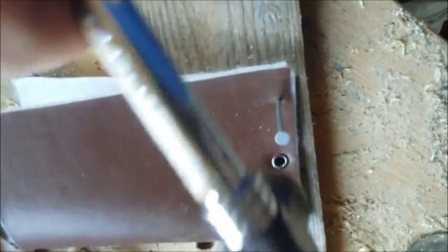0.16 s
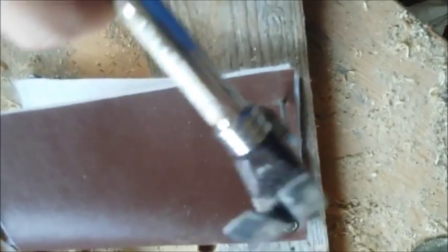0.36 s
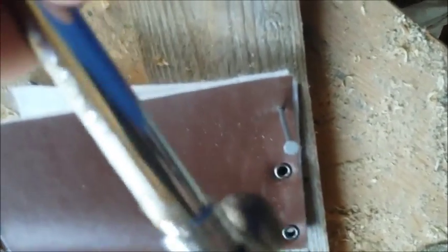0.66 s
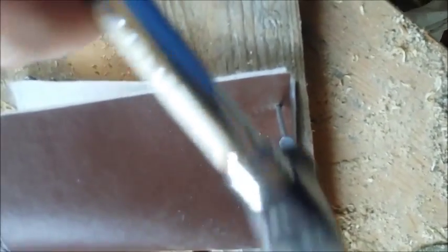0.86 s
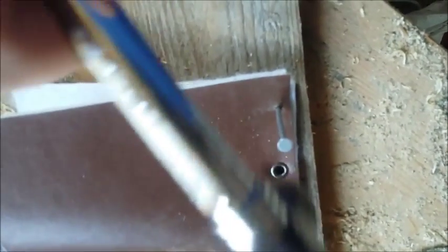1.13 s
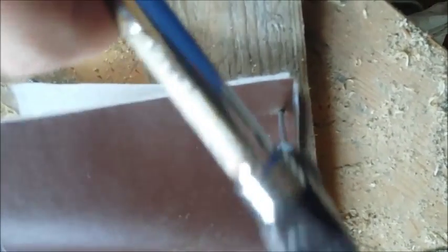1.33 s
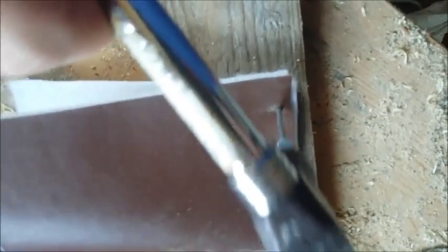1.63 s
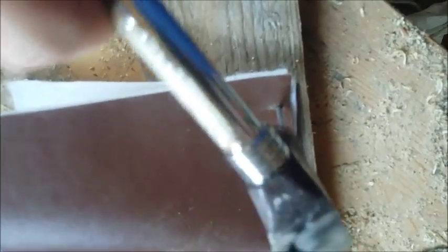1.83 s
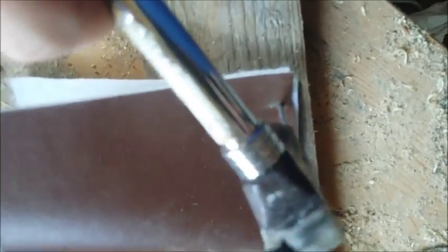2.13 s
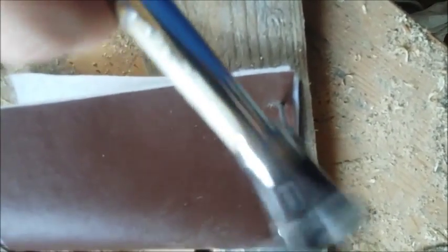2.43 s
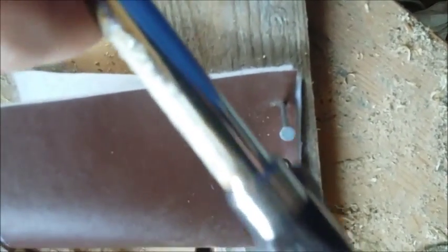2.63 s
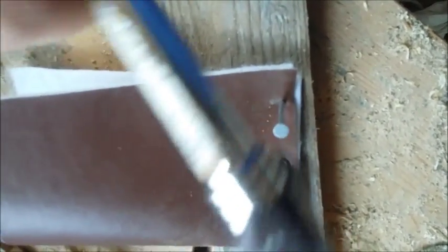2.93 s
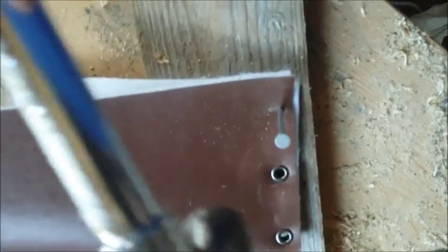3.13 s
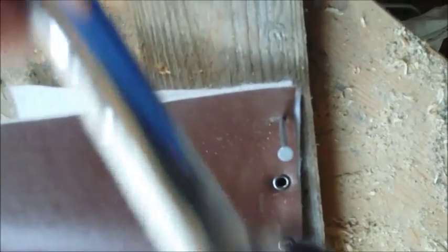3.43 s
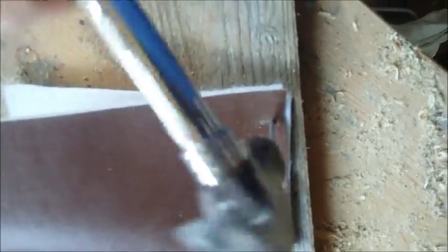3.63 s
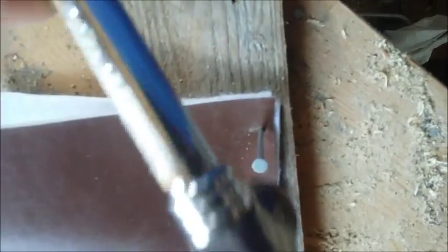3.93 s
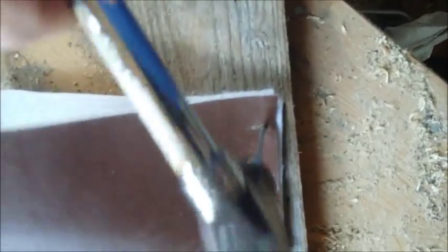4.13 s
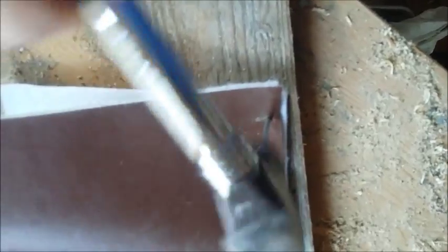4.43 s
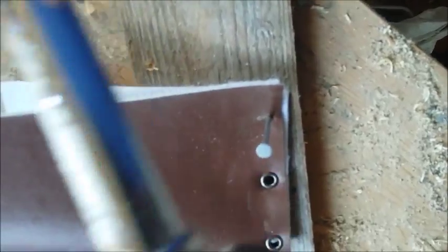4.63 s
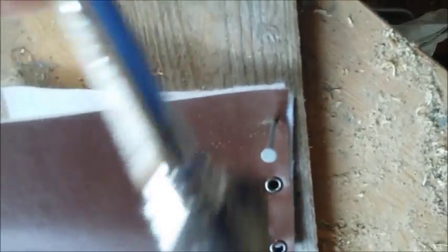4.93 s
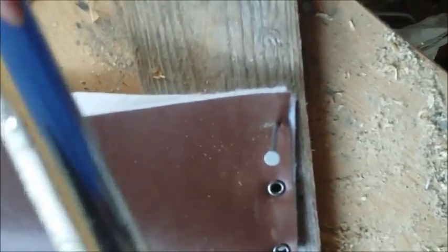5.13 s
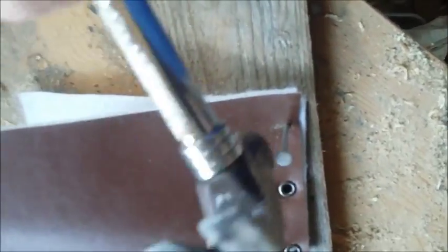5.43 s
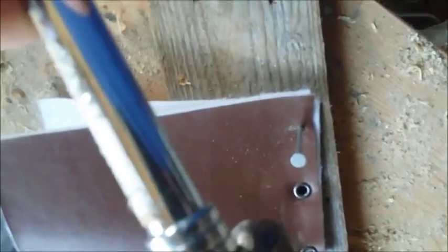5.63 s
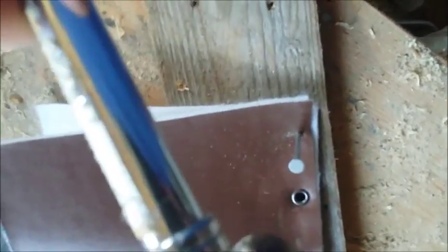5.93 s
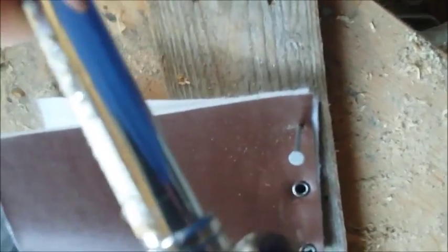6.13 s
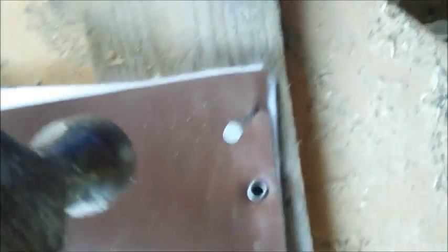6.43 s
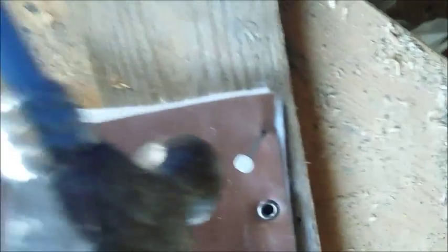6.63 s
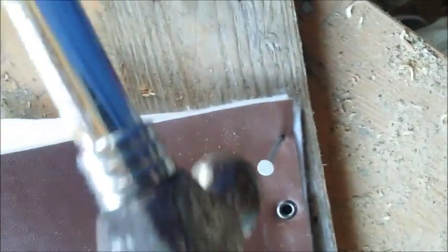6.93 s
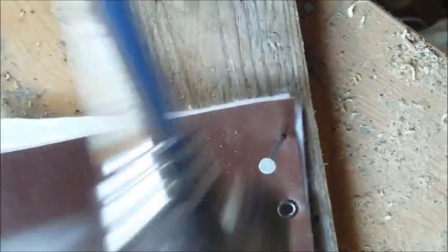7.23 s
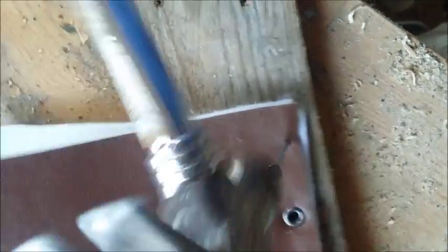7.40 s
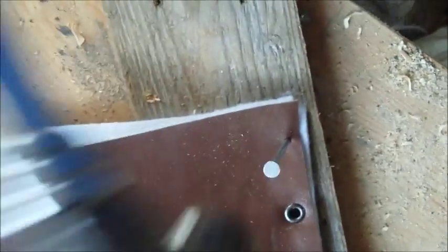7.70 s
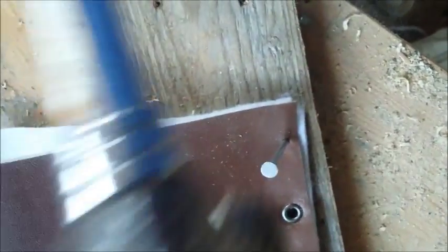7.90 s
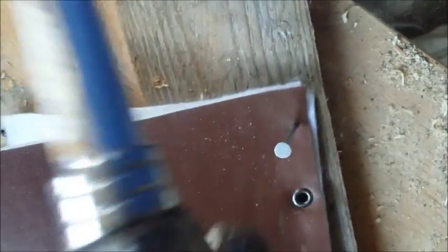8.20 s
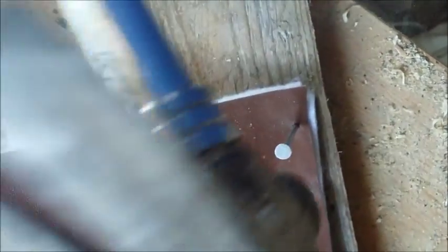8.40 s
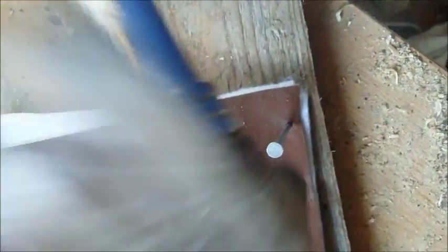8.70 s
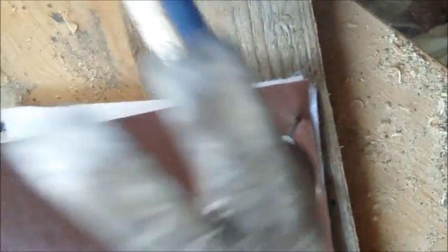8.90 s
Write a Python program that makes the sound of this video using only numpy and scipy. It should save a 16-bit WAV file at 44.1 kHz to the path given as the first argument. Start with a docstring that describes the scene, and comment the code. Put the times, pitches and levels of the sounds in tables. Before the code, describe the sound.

A steel hammer taps a nail through leather into a plank, the blows growing harder and further apart, with faint birds outside.

```python
"""A steel hammer taps, then drives a nail through leather into a plank, close to a stereo microphone
at a workbench in a small shed. Each blow cracks on the nail, sinks it a little, then thumps plank and
bench; the deeper it sits, the less it slides and the harder the blows clack. Faint birds sing outside
over a low rumble and hiss. The background drops out for a moment before the last three blows, and the
hardest of them overdrives the right microphone."""
import sys
import numpy as np
from scipy import signal
from scipy.fft import rfft, irfft, next_fast_len
from scipy.io import wavfile
from scipy.ndimage import uniform_filter1d

SR = 44100
rng = np.random.default_rng(int(sys.argv[2]) if len(sys.argv) > 2 else 0)


def put_to_file(sound):
    """Save the sound as 16-bit audio at rate SR, in the file named by the first command-line argument."""
    columns = np.atleast_2d(sound).T  # one column per channel
    safe = np.clip(columns, -1, 1)
    whole_steps = np.round(safe * 32767)
    wavfile.write(sys.argv[1], SR, whole_steps.astype(np.int16))


N = 399546
TIME = np.arange(N) / SR
TAIL = np.arange(SR * 2 // 5) / SR  # time axis of one strike, s

# Levels in the tables are relative; the gains further down set the balance.
# Blows and hard rebounds: start_s, force_db, slide_s, plank_over_force_db, bench_over_force_db
BLOWS = [(0.1646, -45, 0.0074, 6, 4.5), (1.0379, -43.5, 0.0081, 10.5, 12),
         (1.337, -37.5, 0.00602, 8.5, 11.5), (1.6312, -38, 0.0064, 11.5, 13),
         (1.9314, -37, 0.006, 12.5, 14.5), (2.2263, -35, 0.0027, 14.5, 14), (2.548, -33, 0.0043, 12, 11.5),
         (2.5873, -44.5, 0.0011, 5, 1), (2.9096, -30.5, .0025, 11.5, 12.5), (4.1783, -32, 0.0026, 15, 14),
         (4.5424, -31, .0009, 11, 12.5), (4.9403, -31, 0.001, 11, 13), (5.4542, -31.5, 0.00081, 2.5, 0),
         (5.4937, -40, 0.0015, -6.5, -9), (7.5212, -23, 0.0014, 6.5, 2), (8.1626, -32, .0011, 3, 4.5),
         (8.8746, -34.5, 0.00097, 5, 4)]
# Light touches of the hammer while aiming: start_s, level_db
TOUCHES = [(0.4392, -47.5), (0.4547, -55.5), (.4925, -57.5), (4.516, -53)]
# Ringing modes of each part, of the hard contact and of nearby steel: pitch_hz, level_db, t60_s
NAIL_MODES = [(4300, -7, .012), (4710, -1, .014), (4870, 0, .01), (5050, -2, .012), (5500, -9, .012),
              (8100, -23, .02)]
HAMMER_MODES = [(2465, -2, .025), (2684, 2, .05), (3114, 7, 0.033), (3280, -2, 0.02), (4300, -8.5, 0.012)]
CLACK_MODES = [(1024, -1.5, 0.079), (1151, 2, 0.088), (1199, 0.5, .1), (1300, 7.5, 0.037),
               (1462, -12.5, 0.085), (1655, -5.5, 0.045), (1740, -15.5, 0.37), (1960, -8.5, 0.027),
               (2220, -8, 0.017)]
CLANK_MODES = [(1194, 1.5, 0.092), (1240, -4, .1), (1328, 3, 0.079), (1650, -10, 0.063), (2780, -4, .07)]
PLANK_MODES = [(210, -14.5, 0.3), (255, -0.5, 0.16), (279.7, -7.5, 0.2), (294.4, -1, 0.23),
               (327.4, -5, 0.27), (427.3, -1, 0.18), (463.4, -4.5, 0.21), (522, 4.5, 0.15),
               (570.5, -3.5, 0.22), (617, 3.5, 0.078), (696, -1, 0.14), (768, -2, 0.17), (850, -8, 0.096),
               (951, -10.5, 0.16)]
BENCH_MODES = [(74, -16, 0.44), (109.4, -5.5, 0.32), (124.3, 5.5, 0.15), (152.7, -3.5, 0.26),
               (161.2, -0.5, 0.17)]
NEARBY_STEEL_MODES = [(1319, -8, .8), (1776, 0, .95)]
# Contact noise spectra: frequency_hz, level_db
NAIL_NOISE = [(400, -32.5), (700, -5.5), (1800, -6), (3000, -9.5), (4100, -3), (4900, -1.5), (5600, -1.5),
              (6500, -13), (9000, -21), (12000, -27.5), (16000, -29.5)]
HAMMER_NOISE = [(1700, -31.5), (2300, 8.5), (3000, 0), (3700, -7), (4600, -30.5)]
CLACK_NOISE = [(700, -26.5), (1050, 4), (2100, 7.5), (2800, -39.5)]
PLANK_NOISE = [(120, -31.5), (220, 12.5), (900, 6.5), (1400, -44.5)]
RUB_NOISE = [(400, -22), (1000, 3.5), (1800, 10), (3500, 2), (5200, -12.5), (6500, -23), (8100, -14),
             (9000, -36), (16000, -24.5)]
# Decay of the shed's echo: frequency_hz, t60_s
SHED_DECAY = [(100, .3), (300, .26), (700, .19), (2000, .17), (5000, .18), (9000, .14), (15000, .1)]
# Strength of that echo: frequency_hz, level_db
SHED_ECHO = [(100, -12.5), (300, -9.5), (700, -11.5), (1500, -11), (3000, -8.5), (5000, -10), (8000, -10.5),
             (11000, -12), (15000, -17)]
# Balance at the microphone ports: frequency_hz, left_over_right_db
PORT_BALANCE = [(60, -1.5), (200, -1.5), (500, 0.46), (1300, -1), (2600, 3.5), (3500, -6), (4700, -12),
                (6000, -10.5), (8100, -4), (15000, -1.5)]
# Phase of the direct sound at the ports: frequency_hz, left_lead_rad
PORT_PHASE = [(100, -0.4), (250, -.5), (500, -0.48), (1200, -1.48), (1900, -2.5), (2200, -2), (2600, -4.5),
              (3100, -4.5), (5000, -6.5), (7000, -13), (11500, -14.5), (16000, -24)]
# Likeness of left and right in diffuse sound: frequency_hz, correlation
STEREO_LIKENESS = [(60, 0.67), (290, 0.99), (640, 0.25), (1400, 0), (15000, 0.12)]
# Overload of the right microphone: start_s, deaf_s, swing_hz, swing_db, t60_s
OVERLOAD = [(7.524, 0.0072, 109.1, -1.5, .075)]
# One distant bird's rising chirps: start_s, starting_pitch_hz, level_db
CHIRPS = [(3.189, 2710, -59), (3.467, 2670, -58), (3.745, 2660, -57.5), (4.026, 2610, -57),
          (4.12, 3310, -57)]
# Thin whistles of other birds: start_s, pitch_hz, level_db
WHISTLES = [(3.32, 3190, -78), (3.57, 2760, -63.5), (3.83, 2760, -62), (4.32, 7600, -71.5),
            (4.74, 5640, -67.5), (5.95, 2864, -53), (6.06, 2924, -65.5)]
# Spectra of the outdoor rumble and hiss: frequency_hz, level_db
RUMBLE_SPECTRUM = [(15, -42.5), (25, -10), (27, -25), (50, -6.5), (95, -0.5), (148, -2), (195, -1.5),
                   (275, -5), (310, -11.5), (1500, -24.5), (1950, -52.5), (3300, -120)]
HISS_SPECTRUM = [(700, -27), (1200, -10.5), (1900, -7), (2700, -1), (3300, -4), (4100, -2.5), (5100, -5.5),
                 (6000, -15.5), (7700, -20.5), (10000, -26), (16000, -27.5)]
# Level of the background rumble and hiss, which wavers, then ducks sharply after the hardest blow:
# time_s, level_db
BACKGROUND_LEVEL = [(0, -0.5), (3, 2), (3.4, 0), (5, 1), (6.2, -4), (6.9, 2), (7.5, -0.5), (8, -12.5),
                    (9.06, -13.5)]

NAIL_DB, HAMMER_DB, CLACK_DB = -0.5, 0, 8  # base levels over the force of the blow
CLACK_LOSS_DB_PER_S = 851  # a sliding nail cushions the clack
CLANK_DB, CLANK_KNEE_DB, CLANK_LOSS = -3, 2.5, 6.2  # over the clack; plank level it fades above; dB/dB
RASP_SLIDE_S = .0028  # slide at which a standing nail rasps as loudly as it rings
HOME_S = 6.5  # from here on the nail head sits on the leather
HOME_SHIFT_DB, HOME_RASP_DB = 3.5, 13  # then level passes from nail to hammer, and the rasp grows
REBOUND_S, REBOUND_SCATTER_S, REBOUND_DB = .058, .004, -30  # the hammer falls back with a tick
OUTSIDE_DB = -9.5  # overall gain on birds, rumble and hiss
BIRDS_DB, RUMBLE_DB, HISS_DB = 2.5, -49.5, -55


def blow(force_db, slide_s, plank_db, bench_db, home, vary_db=1.7):
    """Steel cracks at once; the wood takes the load as the nail stops. A long slide dulls its knock."""
    rasp = puff(NAIL_NOISE, t60=.014, hold=.55 * slide_s + .001)
    rasp_gain = slide_s / RASP_SLIDE_S * amp(home * HOME_RASP_DB)
    nail = ring(NAIL_MODES, vary_db, detune=.006) + rasp_gain * rasp
    hammer = ring(HAMMER_MODES, vary_db, detune=.0066)
    hammer += amp(4) * puff(HAMMER_NOISE, t60=.02, hold=slide_s)
    clack = ring(CLACK_MODES, vary_db, detune=.008) + amp(-.5) * puff(CLACK_NOISE, t60=.051)
    plank = ring(PLANK_MODES, vary_db, detune=.0074, tilt_db=2.22 - 1500 * slide_s)
    plank += amp(-1.5) * puff(PLANK_NOISE, t60=.11)
    bench = ring(BENCH_MODES, scatter_db=1.1, detune=.008, phase_scatter=.25)
    clank = ring(CLANK_MODES, vary_db, detune=.003)
    clack_db = CLACK_DB - CLACK_LOSS_DB_PER_S * slide_s
    # the less the wood gives way, the more of the blow goes into a ringing clank
    clank_db = clack_db + CLANK_DB - CLANK_LOSS * max(0, plank_db - CLANK_KNEE_DB)
    return amp(force_db) * (
        amp(NAIL_DB - home * HOME_SHIFT_DB) * loaded(nail, 0, rise_s=.000085)
        + amp(HAMMER_DB + home * HOME_SHIFT_DB) * loaded(hammer, 0, rise_s=.00042)
        + amp(clack_db) * loaded(clack, .42 * slide_s, rise_s=.001)
        + amp(clank_db) * loaded(clank, slide_s, rise_s=.0006)
        + amp(plank_db) * loaded(plank, .95 * slide_s, rise_s=.0022)
        + amp(bench_db) * loaded(bench, slide_s + .0027, rise_s=.007))


def hammering(walls, change_rad=.6, sing_db=-43):
    """Close blows, each with its rebound; the echo changes a little as arm and microphone move."""
    track = np.zeros((2, N))
    for start_s, force_db, slide_s, plank_db, bench_db in BLOWS:
        echo = np.cos(change_rad) * walls + np.sin(change_rad) * shed_echo()
        strike = blow(force_db, slide_s, plank_db, bench_db, home=start_s > HOME_S)
        add(track, start_s, in_shed(strike, echo))
        tick = amp(force_db + REBOUND_DB) * puff(NAIL_NOISE, t60=.008)
        tick_s = start_s + REBOUND_S + REBOUND_SCATTER_S * rng.standard_normal()
        add(track, tick_s, in_shed(tick, echo))
        # some steel nearby sings on faintly after a hard clack
        sing = ring(NEARBY_STEEL_MODES, scatter_db=1.5, detune=0, t=np.arange(SR) / SR)
        add(track, start_s, amp(force_db + sing_db - CLACK_LOSS_DB_PER_S * slide_s) * sing)
    return track


def ring(modes, scatter_db, detune, phase_scatter=1.95, tilt_db=0, t=TAIL):
    """Damped modes; each strike wakes them a little differently. Tilt is per octave."""
    hz, db, t60 = np.transpose(modes)[:, :, None]
    level, shift, phase = rng.standard_normal((3, len(modes), 1))
    gain = amp(db + scatter_db * level + tilt_db * np.log2(hz / hz[0]) - 60 * t / t60)
    tones = np.sin(2 * np.pi * hz * (1 + detune * shift) * t + phase_scatter * phase)
    return burst(np.sum(gain * tones, axis=0))


def puff(spectrum, t60, hold=0):
    """Contact noise that lasts while the parts rub, then dies."""
    return burst(noise(spectrum, len(TAIL)) * amp(-60 * np.maximum(TAIL - hold, 0) / t60))


def loaded(sound, delay_s, rise_s):
    """A part takes up the load late and gradually."""
    rising = sound * (1 - np.exp(-TAIL / rise_s))
    late = np.pad(rising, (max(round(delay_s * SR), 0), 0))
    return burst(late[:len(TAIL)])


def aiming(walls, rub_middle_s=.54, rub_half_s=.028, rub_db=-43.5):
    """The hammer touches the nail lightly and slides once over the leather."""
    swell = np.exp(-((TIME - rub_middle_s) / rub_half_s) ** 2)
    track = amp(rub_db) * swell * noise(RUB_NOISE, N)
    for start_s, db in TOUCHES:
        add(track, start_s, amp(db) * puff(RUB_NOISE, t60=.03))
    return in_shed(track, walls)


def shed_echo(first_wall_s=.004):
    """Stereo echo off the close walls; each frequency dies at its own speed."""
    hz, t, bands = signal.stft(rng.standard_normal((2, len(TAIL))), SR, nperseg=256)
    decay = amp(-60 * t / along(SHED_DECAY, hz)[:, None])
    energy = np.sum(decay ** 2, axis=1, keepdims=True) * SR * t[1]
    decay *= amp(along(SHED_ECHO, hz))[:, None] / np.sqrt(energy)
    tail = signal.istft(bands * decay, SR, nperseg=256)[1]
    late = np.pad(tail, ((0, 0), (round(first_wall_s * SR), 0)))
    return spread(late[:, :len(TAIL)])


def in_shed(sound, echo):
    """Direct sound reaches the right port first, bent round the housing; the walls follow."""
    direct = filtered(sound, lambda hz: np.array([np.exp(1j * along(PORT_PHASE, hz)), np.ones_like(hz)]))
    reflected = signal.fftconvolve(sound[None], echo, axes=1)[:, :len(sound)]
    lean = np.array([[.5], [-.5]])
    balance = lambda hz: amp(lean * along(PORT_BALANCE, hz))
    room_gain = lambda hz: np.hypot(1, amp(along(SHED_ECHO, hz)))
    return filtered(direct + reflected, lambda hz: balance(hz) / room_gain(hz))


def birds(echo_db=-2, t60=.23):
    """Distant chirps and whistles, blurred by the trees."""
    song = np.zeros(N)
    for start_s, hz, db in CHIRPS:
        add(song, start_s, amp(db) * bird_note(hz, length_s=.043, rise=.19, arch=.077))
    for start_s, hz, db in WHISTLES:
        add(song, start_s, amp(db) * bird_note(hz, length_s=.12, rise=0, arch=-.022))
    trees = rng.standard_normal((2, len(TAIL))) * amp(-60 * TAIL / t60)
    echo = signal.fftconvolve(song[None], trees / np.linalg.norm(trees[0]), axes=1)[:, :N]
    return amp(BIRDS_DB) * (song + amp(echo_db) * echo)


def bird_note(hz, length_s, rise, arch):
    """A whistle swells and fades along an arc; rise and arch are shares of the pitch."""
    progress = np.linspace(0, 1, round(length_s * SR))
    arc = np.sin(np.pi * progress)
    pitch = hz * (1 + rise * progress + arch * arc)
    return unit(arc * np.sin(2 * np.pi * np.cumsum(pitch) / SR))


def air(patchy_db=1.5, hiss_swing=2):
    """Low rumble and a softly shifting outdoor hiss; both waver and duck, the hiss more deeply."""
    level_db = np.interp(TIME, *np.transpose(BACKGROUND_LEVEL))
    rumble = spread(np.array([noise(RUMBLE_SPECTRUM, N) for _ in range(2)]))
    bands = signal.stft(np.array([noise(HISS_SPECTRUM, N) for _ in range(2)]), nperseg=512)[2]
    patches = uniform_filter1d(rng.standard_normal(bands.shape[1:]), size=7, axis=0)  # across pitch
    patches = uniform_filter1d(patches, size=30, axis=1)  # across time
    hiss = signal.istft(bands * amp(patchy_db * unit(patches)), nperseg=512)[1][:, :N]
    return amp(RUMBLE_DB + level_db) * unit(rumble) + amp(HISS_DB + hiss_swing * level_db) * unit(hiss)


def outside_gain(cut_s=6.22, whole_s=6.79, return_db_per_s=103):
    """The background cuts out at once and swells back."""
    dip_db = return_db_per_s * np.minimum(TIME - whole_s, 0) * (TIME > cut_s)
    return amp(OUTSIDE_DB + dip_db)


def overdriven(stereo):
    """The right microphone goes deaf for a moment and swings back to rest."""
    left, right = stereo
    for start_s, deaf_s, hz, db, t60 in OVERLOAD:
        t = np.maximum(TIME - start_s, 0)
        deafness = (1 - np.exp(-t / .0004)) * np.exp(-(t / deaf_s) ** 2)
        swing = amp(db - 60 * t / t60) * np.sin(2 * np.pi * hz * t)
        right = right * (1 - deafness) + swing
    return np.array([left, right])


def amp(db):
    """Decibels to amplitude."""
    return 10 ** (np.asarray(db) / 20)


def unit(x):
    """Scale to rms 1."""
    return x / np.sqrt(np.mean(x ** 2) + 1e-20)


def burst(x):
    """Scale to the energy of 50 ms at rms 1."""
    return x * np.sqrt(SR / 20 / (np.sum(x ** 2) + 1e-20))


def along(points, hz):
    """Read (frequency_hz, value) points on a log axis."""
    point_hz, values = np.transpose(points)
    return np.interp(np.log(hz + 1), np.log(point_hz), values)


def filtered(x, response):
    """Apply a complex frequency response."""
    size = x.shape[-1]
    padded = next_fast_len(size + 2048)
    return irfft(rfft(x, padded) * response(np.fft.rfftfreq(padded, 1 / SR)), padded)[..., :size]


def noise(spectrum, size):
    """Coloured noise of rms 1."""
    return unit(filtered(rng.standard_normal(size), lambda hz: amp(along(spectrum, hz))))


def spread(pair):
    """Two unrelated signals become a stereo field, alike in the bass."""
    turn = lambda hz: np.arccos(np.clip(along(STEREO_LIKENESS, hz), -1, 1)) / 2
    mid, side = filtered(pair, lambda hz: np.array([np.cos(turn(hz)), np.sin(turn(hz))]))
    return np.array([mid + side, mid - side])


def add(track, start_s, sound):
    """Mix a sound into a track."""
    start = max(round(start_s * SR), 0)
    track[..., start:start + sound.shape[-1]] += sound[..., :N - start]


def scene():
    """Hammer work up close in the shed, with the outdoors far behind."""
    walls = shed_echo()
    return hammering(walls) + aiming(walls) + (air() + birds()) * outside_gain()


def record(dry):
    """The microphones thin the deepest bass, overload once, round off peaks and lose the top treble."""
    low_cut_hz, top_hz = 38, 16400
    ceiling, hardness = .88, 6
    low_cut = signal.butter(2, low_cut_hz, "high", fs=SR, output="sos")
    picked_up = overdriven(signal.sosfilt(low_cut, dry))
    rounded = picked_up / (1 + np.abs(picked_up / ceiling) ** hardness) ** (1 / hardness)
    return filtered(rounded, lambda hz: 1 / (1 + (hz / top_hz) ** 120))


dry = scene()
out = record(dry)
put_to_file(out)
```